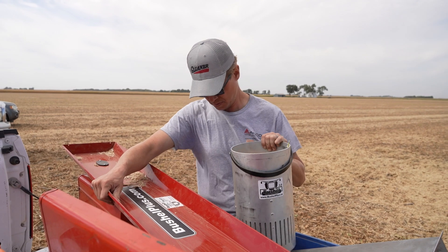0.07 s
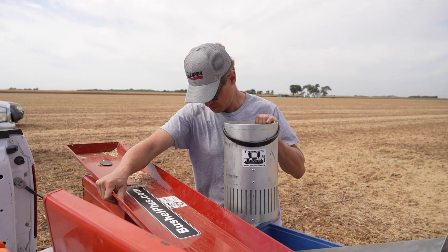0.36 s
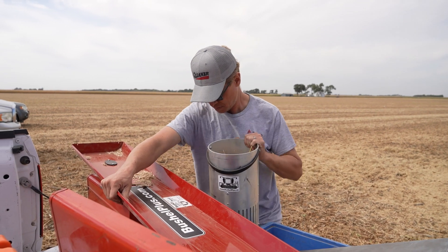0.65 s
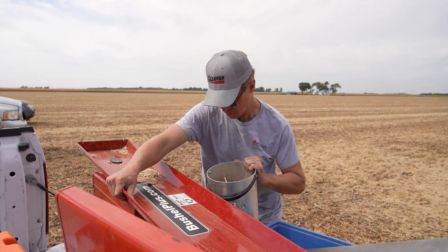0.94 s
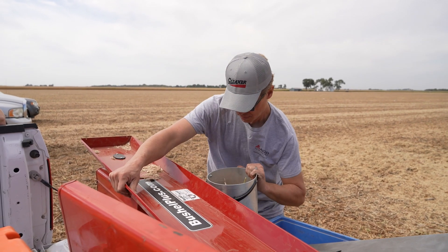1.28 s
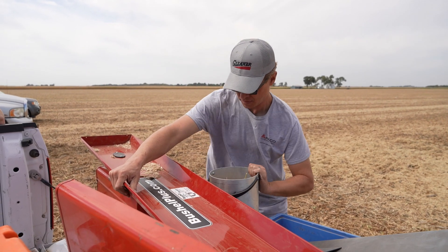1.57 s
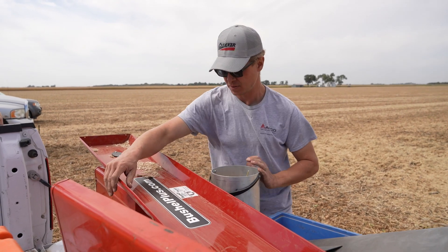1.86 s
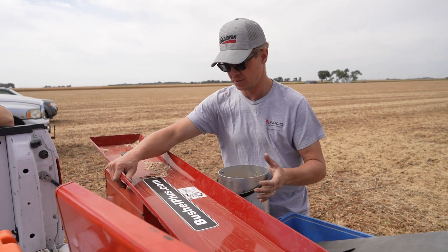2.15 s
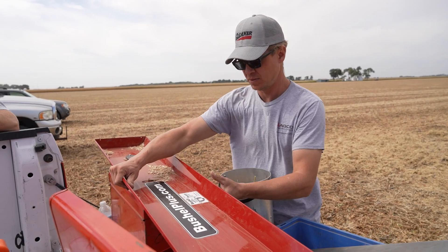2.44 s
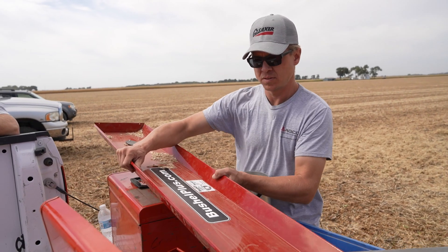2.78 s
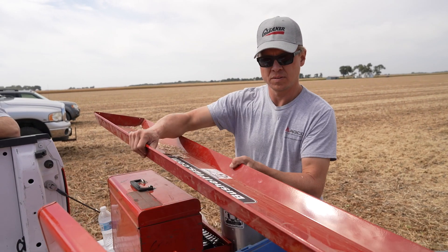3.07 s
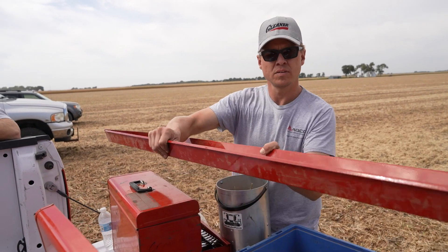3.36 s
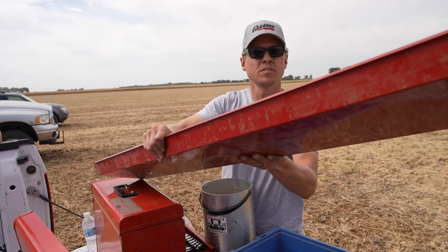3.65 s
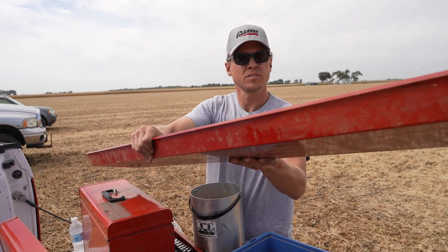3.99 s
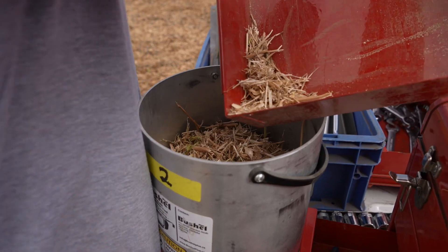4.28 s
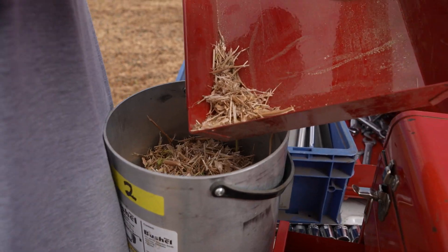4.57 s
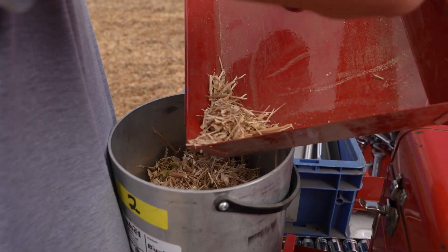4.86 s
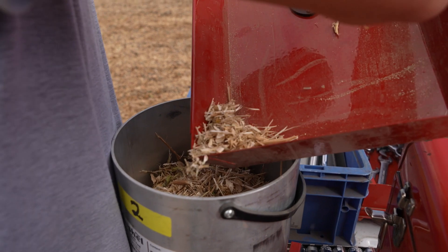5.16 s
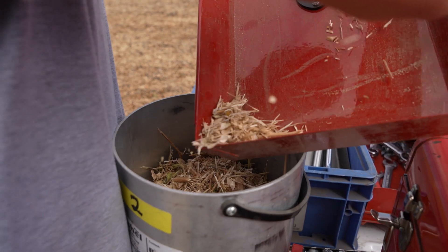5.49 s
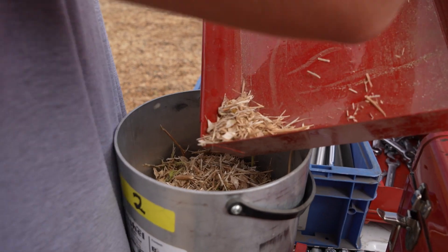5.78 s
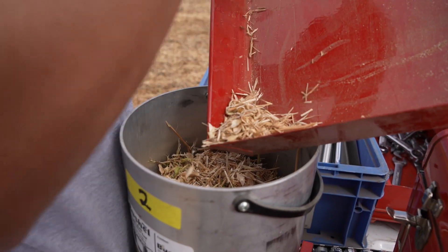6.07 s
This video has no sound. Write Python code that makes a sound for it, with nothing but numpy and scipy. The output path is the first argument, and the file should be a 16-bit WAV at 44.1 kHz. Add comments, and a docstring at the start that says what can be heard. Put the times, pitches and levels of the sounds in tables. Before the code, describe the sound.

Thin steel clanks and ringing slaps on a metal chute, with faint pattering chaff, light wind and a distant idling engine.

```python
"""A steel bucket knocks into place on a sheet-metal machine in an open stubble field, over a light
breeze and a far-off idling engine. Its wire handle jingles, a long steel chute scuffs the machine,
and a lid drops shut. The chute is lifted off, rested on the bucket and slapped, so the last chaff
ticks and patters down it. Each blow makes thin steel ring with a few clear tones (its modes) and a
wash of many weaker ones, played as fading noise."""
import sys
import numpy as np
from scipy import signal
from scipy.io import wavfile

SR = 44100
rng = np.random.default_rng(int(sys.argv[2]) if len(sys.argv) > 2 else 0)


def output_pcm(signal):
    """Save a mono or channel-first signal as 16-bit PCM at the path in sys.argv[1].

    Samples are clipped to [-1, 1] before scaling.
    """
    pcm = np.clip(np.atleast_2d(signal).T, -1, 1) * 32767
    wavfile.write(sys.argv[1], SR, np.round(pcm).astype(np.int16))


N = 274743

# Knocks of the bucket and the lid. Each row: start in seconds, level, bass and treble in dB, ring length
# factor, pitch the struck spot favours in Hz, its boost in dB, seconds to the first rebound, loss per
# rebound in dB.
BUCKET_KNOCKS = [(0.0165, -23, -7.5, 4.5, 0.5, 790, 7, 0.006, 12),
                 (0.029, -26.5, -18, 8.5, 0.85, 5994, 4, 0.021, 16),
                 (0.1163, -27.5, -2, -3, 0.2, 3500, 11, 0.006, 5.5),
                 (0.122, -39.5, 4.5, -4.5, 0.98, 172, 15, 0.02, 11),
                 (1.038, -36, 4, -9.5, 0.71, 343, 3, 0.039, 10),
                 (1.0818, -25, -7, 2, 1.2, 304, 6.5, 0.028, 8),
                 (1.154, -23, -0.5, 6, 0.89, 390, 2.5, 0.034, 8),
                 (1.257, -35.5, -15, -6, 1, 350, 0, 0.015, 11),
                 (1.275, -39, -10, 5, 1.14, 5200, 6, 0.015, 8),
                 (1.3268, -23, -9.5, 3.5, 0.85, 1070, 2, 0.046, 17.5),
                 (1.549, -42.5, 2.5, -6, 1.6, 600, 2, 0.019, 10),
                 (1.588, -36, 7, -1, 0.46, 420, -4, 0.02, 16),
                 (2.003, -36, -14, -11, 0.72, 2030, 8, 0.018, 7),
                 (2.2755, -32, -17, 1, 0.56, 1120, 11, 0.026, 12),
                 (2.434, -43.5, -26, -12, 0.39, 1060, 12, 0.01, 19),
                 (2.499, -38, -32, -18, 0.99, 1120, 5, 0.02, 12),
                 (2.559, -38.5, -25, -18.5, 0.43, 3430, 8.5, 0.039, 2),
                 (2.88, -47.5, -9, -11.5, 0.97, 3260, 2, 0.017, 9)]
LID_SLAMS = [(2.952, -25.5, -8, 1.3, 0.8, 1300, 6.5, 0.026, 7.1)]
# Blows on the chute. Each row: the first seven columns above, then panel flex in dB relative to the blow.
CHUTE_BLOWS = [(3.7074, -26, -7, 5, 0.77, 1350, 5.5, -20), (4.7167, -27.5, -1.5, 2, 0.79, 1550, 10, 8),
               (4.8841, -20.5, 6, 3.5, 0.78, 585, 2.7, 4.5), (5.030, -30, 11.5, 6.5, 0.84, 570, 4.5, 14),
               (5.199, -18, 4, 1.5, 0.81, 1100, 1, 5), (5.3095, -34.5, 11, -6, 1.0, 400, 0, 13),
               (5.736, -47.5, 19, -29, 0.82, 296, 5, 7)]
# Stray bits of chaff hitting steel. Each row: start in seconds, level in dB.
STRAY_TICKS = [(3.208, -72), (4.282, -63.5)]
# Soft bumps as the chute is swung. Each row: start in seconds, level in dB, pitch in Hz.
SWING_BUMPS = [(3.572, -32.5, 45), (3.838, -37.5, 72)]
# Each object's clear tones. Each row: pitch in Hz, relative level in dB, base seconds to fade by 60 dB.
BUCKET_MODES = [(304, -8, .3), (392, -10, .3), (473, -11, .3), (567, -17, .3), (616, -11, .2),
                (716, -8, .22), (790, -12, .2), (985, -14, .24), (1084, -8, .16), (1535, -13, .25),
                (1640, -15, .18), (2137, -21, .17), (2441, -20, .17), (2526, -19, .16), (2692, -21, .18),
                (2838, -21, .19), (3020, -19, .15), (3187, -19, .15), (3985, -20, .15), (4332, -19, .16),
                (4780, -21, .14), (5646, -21, .15)]
HANDLE_MODES = [(6080, -4, .13), (6850, -4, .12), (8150, -3, .14), (8330, -6, .14), (9900, -1, .14),
                (10130, -6, .11), (12300, -5, .12), (12520, -8, .1), (13850, -14, .1), (14650, -14, .11)]
LID_MODES = [(147, 0.5, 0.19), (204.5, -2, 0.5), (472, -8.5, 0.52), (664, -4, 0.39), (1138, -14, 0.53),
             (1289, -2.5, 0.23), (1450, -20, 0.38), (1570, -7, 0.24), (2130, -10, 0.37), (2450, -18, 0.21),
             (3210, -10, .17), (3340, -10.5, 0.25), (4050, -3.5, 0.12), (6430, -14, 0.18),
             (6770, -19, 0.13)]
CHUTE_MODES = [(270, -18, .4), (296, -19, .75), (375, -9, .5), (420, -18, .45), (472, -12, .42),
               (526, -5, .44), (544, -9, .48), (565, -12, .45), (600, -11, .35), (647, -19, .35),
               (745, -19, .3), (877, -21, .35), (915, -18, .33), (1076, -10, .26), (1180, -20, .19),
               (1291, -13, .25), (1337, -17, .28), (1540, -25, .2), (1610, -23, .26), (2315, -32, .2),
               (2640, -33, .18)]
# Each object's crowd of weaker tones. Each row: frequency in Hz, relative level in dB per Hz.
BUCKET_WASH = [(45, -25), (90, 7.5), (150, 0.5), (220, 2), (450, 5.5), (700, 0.5), (1100, -4.5), (1600, -6),
               (2000, -8.5), (4000, -9.5), (6400, -15.5), (8500, -23.5), (15000, -40.5)]
LID_WASH = [(70, 4), (170, -3), (300, 2), (600, 3), (1300, -1), (2200, -5), (4000, -6), (6600, -9.5),
            (8500, -20), (15000, -28)]
CHUTE_WASH = [(60, -9), (140, -9), (210, -3.5), (350, -1), (550, -9), (800, -2.5), (1350, -11.5),
              (2100, -22), (3600, -25), (6000, -32), (9000, -51), (15000, -61.5)]
# How long thin steel rings. Each row: frequency in Hz, base seconds to fade by 60 dB.
STEEL_RING_TIMES = [(80, 0.71), (400, 0.6), (1200, 0.46), (3000, 0.28), (7000, 0.17), (15000, 0.2)]
# The tone colour of the background. Each row: frequency in Hz, relative level in dB per Hz.
FIELD_COLOUR = [(25, -7), (45, -0.5), (76, -2), (136, -2.5), (200, -12.5), (320, -17.5), (550, -11.5),
                (950, -15), (1250, -18.5), (1900, -23.5), (2800, -34.5), (4500, -40.5), (6600, -48.5),
                (9000, -58), (12000, -58.5), (15000, -74)]
# The rush of far machinery and the rumble of the breeze. Each row: time in seconds, level in dB.
RUSH_LEVELS = [(0, -63.5), (0.85, -56), (1.6, -58.5), (2.85, -58.5), (3.3, -64), (4.1, -62.5), (4.55, -66),
               (6.23, -65.5)]
BREEZE_LEVELS = [(0, -50), (0.5, -50.5), (0.85, -49.5), (1.7, -48), (2.05, -52.5), (3.3, -55), (3.85, -50),
                 (4.4, -52.5), (6.23, -53.5)]

BAND_HZ = np.geomspace(25, 15000, 24)   # centres of the noise bands
TIME = np.arange(N) / SR   # seconds through the scene
RING_TIME = np.arange(int(0.8 * SR)) / SR   # seconds after a blow


def from_db(db):
    """Turn decibels into a gain."""
    return 10 ** (np.asarray(db) / 20)


def unit_level(x):
    """Scale a sound to an average power of 1."""
    return x / np.sqrt(np.mean(x ** 2) + 1e-20)


def at_hz(table, hz):
    """Read between a table's rows on a scale of octaves."""
    row_hz, values = np.transpose(table)
    return np.interp(np.log(hz), np.log(row_hz), values)


def drift(rate_hz):
    """Glide between random values, rate_hz of them a second."""
    return np.interp(TIME * rate_hz % 255, np.arange(256), rng.standard_normal(256))


def fade(ring_s):
    """Die away by 60 dB in ring_s seconds."""
    return np.exp(-np.log(1000) * RING_TIME / ring_s)


def add(out, start_s, sound):
    """Mix a sound in at its start time."""
    i = max(round(start_s * SR), 0)
    out[i:i + len(sound)] += sound[:N - i]


def noise_bands():
    """Equally strong bands of noise, each unrelated to its neighbours."""
    half_step = np.sqrt(BAND_HZ[1] / BAND_HZ[0])
    white = rng.standard_normal((2, N))
    bands = []
    for k, hz in enumerate(BAND_HZ):
        band_filter = signal.butter(4, [hz / half_step, hz * half_step], "band", fs=SR, output="sos")
        bands.append(unit_level(signal.sosfilt(band_filter, white[k % 2])))
    return np.array(bands)


def band_gains(spectrum):
    """Share a total power of 1 among the bands."""
    gains = from_db(at_hz(spectrum, BAND_HZ)) * np.sqrt(BAND_HZ)
    return gains / np.linalg.norm(gains)


def contact_colour(hz, bass_db, treble_db, focus_hz, focus_db):
    """A heavy blow feeds low tones, a hard one high tones, and the struck spot favours one region."""
    bass = 1 / (1 + (hz / 330) ** 2)
    treble = 1 / (1 + (1900 / hz) ** 4)
    focus = np.exp(-0.5 * (np.log2(hz / focus_hz) / 0.31) ** 2)
    return from_db(bass_db * bass + treble_db * treble + focus_db * focus)


def struck_steel(blows, modes, wash, bands, wash_db, wash_length, modes_db,
                 chatter_db, chatter_s, spread_s):
    """Thin steel rings with clear tones over a wash that is loudest while the contact chatters."""
    out = np.zeros(N)
    hz, mode_db, ring_s = np.transpose(modes)
    wash_ring_s = wash_length * at_hz(STEEL_RING_TIMES, BAND_HZ)
    # Low bending waves travel more slowly, so the lows build up later.
    wash_rise = 1 - np.exp(-RING_TIME / (spread_s * np.sqrt(1000 / BAND_HZ))[:, None])
    tone_rise = 1 - np.exp(-RING_TIME / spread_s)
    chatter = 1 + from_db(chatter_db) * np.exp(-(RING_TIME / chatter_s) ** 2)
    for s, db, bass_db, treble_db, length, focus_hz, focus_db, *_ in blows:
        contact = bass_db, treble_db, focus_hz, focus_db
        offset = rng.integers(N - len(RING_TIME))
        noise = bands[:, offset:offset + len(RING_TIME)]
        gains = band_gains(wash) * contact_colour(BAND_HZ, *contact)
        dense = gains @ (noise * wash_rise * fade(length * wash_ring_s[:, None])) * chatter
        # No two blows share their force alike among the tones.
        strength = from_db(mode_db + rng.standard_normal(len(hz))) * contact_colour(hz, *contact)
        waves = np.sin(2 * np.pi * (hz[:, None] * RING_TIME + rng.random((len(hz), 1))))
        clear = strength @ (waves * fade(length * ring_s[:, None])) * tone_rise
        add(out, s, from_db(db) * (from_db(wash_db) * dense + from_db(modes_db) * clear))
    return out


def with_rebounds(knocks, thud_hz, thud_db, heavier_db, duller_db, gap_shrink=0.76):
    """Each knock rebounds twice, ever sooner, weaker and duller, landing flatter with more thud."""
    contacts = []
    for s, db, bass_db, treble_db, length, focus_hz, focus_db, gap_s, loss_db in knocks:
        contacts.append((s, db, bass_db, treble_db, length, focus_hz, focus_db))
        for k in (1, 2):
            s += gap_s * gap_shrink ** (k - 1)
            contacts.append((s, db - k * loss_db, bass_db + k * heavier_db, treble_db - k * duller_db,
                             length, thud_hz, thud_db))
    return contacts


def bucket(contacts, bands):
    """The bucket clanks and chatters against the machine."""
    return struck_steel(contacts, BUCKET_MODES, BUCKET_WASH, bands, wash_db=-7, wash_length=0.71,
                        modes_db=-5.5, chatter_db=-0.5, chatter_s=0.026, spread_s=0.00033)


def breeze_and_machinery(gust_db=2, hiss_db=-77, drone_db=-55.5, drone_follows=0.47):
    """Wind rumbles and hisses; far machinery rushes, and its low drone partly follows that level."""
    rush_db = np.interp(TIME, *np.transpose(RUSH_LEVELS))
    rumble_db = np.interp(TIME, *np.transpose(BREEZE_LEVELS))
    bands, gains = noise_bands(), band_gains(FIELD_COLOUR)
    region = np.digitize(BAND_HZ, [190, 1200, 3400])   # borders in Hz between the four noises
    rumble, drone, rush, hiss = [unit_level(gains * (region == k) @ bands) for k in range(4)]
    breeze = rumble * from_db(rumble_db + gust_db * drift(rate_hz=12)) + hiss * from_db(hiss_db)
    swing_db = drone_follows * (rush_db - rush_db.mean())
    return breeze + drone * from_db(drone_db + swing_db) + rush * from_db(rush_db)


def engine(firing_hz=77.5, level_db=-58.5):
    """The firing of a far-off idling engine makes one low, wavering tone."""
    waver_db = 2.5 * drift(rate_hz=14)
    cycles = np.cumsum(firing_hz * (1 + 0.03 * drift(rate_hz=12))) / SR
    return np.sqrt(2) * np.sin(2 * np.pi * cycles) * from_db(level_db + waver_db)


def handle(contacts, free_from_s=1.078, free_until_s=1.3, lag_s=0.011, relative_db=-21):
    """While the wire handle swings free, each jolt rings it, slightly retuned as it shifts in its lugs."""
    out = np.zeros(N)
    hz, mode_db, ring_s = np.transpose(HANDLE_MODES)
    for s, db, *_ in contacts:
        if free_from_s < s < free_until_s:
            strength, shift = rng.standard_normal((2, len(hz)))
            tuned_hz = hz * (1 + 0.006 * shift)
            tones = np.sin(2 * np.pi * tuned_hz[:, None] * RING_TIME) * fade(ring_s[:, None])
            add(out, s + lag_s, from_db(db + relative_db + mode_db + 2 * strength) @ tones)
    return out


def chaff(tilted_s=4.2, hop_lag_s=0.014, flight_s=0.039, grains_per_s=600, grain_fade_s=0.02):
    """Dry straw settles in the bucket; once the chute is tilted, each slap makes it hop and slide."""
    flow, ticks = np.zeros(N), list(STRAY_TICKS)
    settling = np.exp(-TIME / 0.9)
    add(flow, 1.62, from_db(-80.5) * settling)   # after the bucket is set down
    for s, db, *_ in CHUTE_BLOWS:
        if s > tilted_s:
            add(flow, s, from_db(db - 66) * settling)   # sliding
            ticks.append((s + hop_lag_s, db - 38.5))   # hopping up
            ticks.append((s + hop_lag_s + flight_s, db - 46.5))   # landing
    sizes = from_db(5 * np.minimum(rng.exponential(1, N), 3))
    grains = sizes * (rng.random(N) < grains_per_s / SR)
    # Each grain is a puff of noise that dies at once.
    puffs = signal.lfilter([1], [1, -from_db(-60 / (grain_fade_s * SR))], grains)
    out = unit_level(puffs * rng.standard_normal(N)) * flow
    for s, db in ticks:
        add(out, s, from_db(db) * rng.standard_normal(len(RING_TIME)) * fade(ring_s=0.072))
    return 2 * signal.sosfilt(signal.butter(2, [2800, 8500], "band", fs=SR, output="sos"), out)


def scuff(bands, start_s=2.735, length_s=0.065, edge_s=0.026):
    """The chute scuffs along the machine as it is gripped, with a faint high ring."""
    colour = contact_colour(BAND_HZ, bass_db=-11, treble_db=-16.5, focus_hz=3260, focus_db=8)
    rubbing = band_gains(BUCKET_WASH) * colour @ bands
    t = TIME - start_s
    stroke = np.clip(np.minimum(t, length_s + edge_s - t) / edge_s, 0, 1)
    return rubbing * stroke * from_db(-45 + 2.2 * drift(rate_hz=68))


def lid(bands):
    """The lid drops shut and rebounds with a low thud."""
    contacts = with_rebounds(LID_SLAMS, thud_hz=168, thud_db=12.5, heavier_db=7, duller_db=3)
    return struck_steel(contacts, LID_MODES, LID_WASH, bands, wash_db=-3, wash_length=0.94,
                        modes_db=-6, chatter_db=0.5, chatter_s=0.0024, spread_s=0.0027)


def panel_flex(hz, peak_s):
    """A panel bends to and fro for a few cycles that grow and quickly die."""
    age = RING_TIME / peak_s
    return np.sin(2 * np.pi * hz * RING_TIME) * age * np.exp((1 - age ** 2) / 2)


def chute(bands):
    """A blow flexes the panel and sets the whole chute ringing; swinging it gives low bumps."""
    out = struck_steel(CHUTE_BLOWS, CHUTE_MODES, CHUTE_WASH, bands, wash_db=-15, wash_length=0.92,
                       modes_db=-1.5, chatter_db=-3, chatter_s=0.02, spread_s=0.0002)
    for s, db, *_, flex_db in CHUTE_BLOWS:
        add(out, s, from_db(db + flex_db) * panel_flex(hz=533, peak_s=0.0046))
    for s, db, hz in SWING_BUMPS:
        add(out, s, from_db(db) * panel_flex(hz, peak_s=0.9 / hz))
    return out


def scene():
    """Mix everything into one channel; the open field adds no echo."""
    bands = noise_bands()
    contacts = with_rebounds(BUCKET_KNOCKS, thud_hz=400, thud_db=6, heavier_db=2.5, duller_db=1.7)
    steel = bucket(contacts, bands) + lid(bands) + chute(bands) + handle(contacts)
    return (steel + chaff() + scuff(bands) + breeze_and_machinery() + engine())[None]


def record(dry, cutoff_hz=15900):
    """Cut the highest treble steeply."""
    return signal.sosfilt(signal.ellip(10, 0.1, 80, cutoff_hz, fs=SR, output="sos"), dry)


dry = scene()
out = record(dry)
output_pcm(out)
```